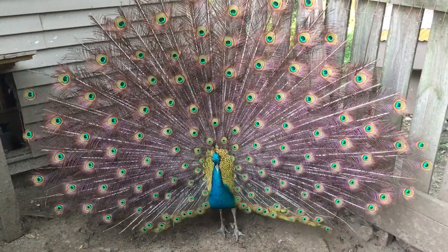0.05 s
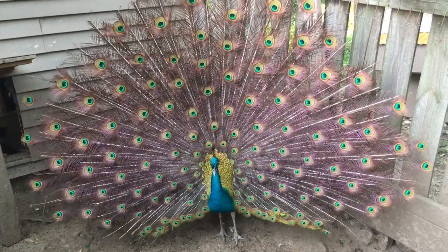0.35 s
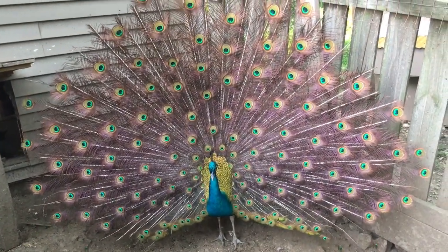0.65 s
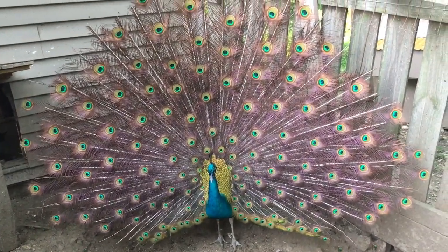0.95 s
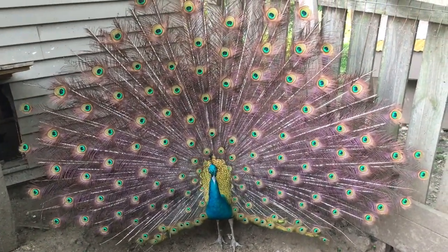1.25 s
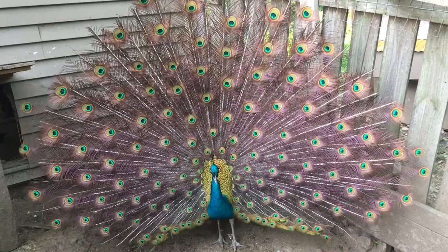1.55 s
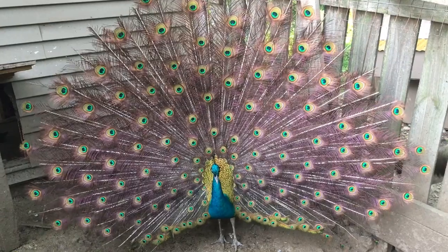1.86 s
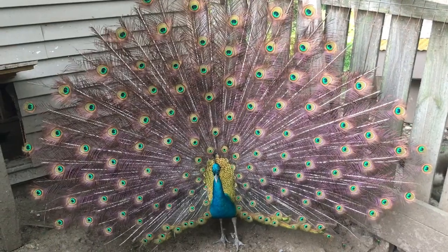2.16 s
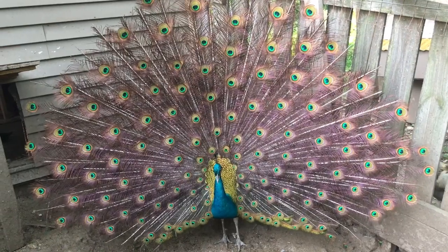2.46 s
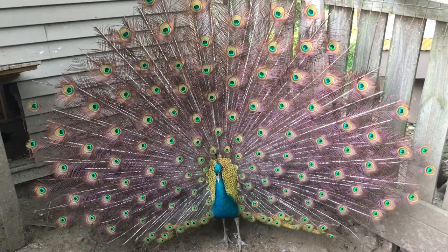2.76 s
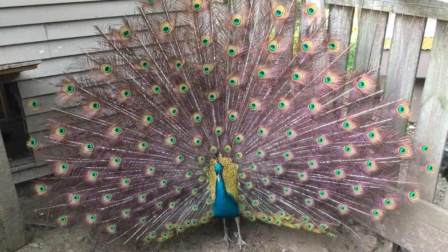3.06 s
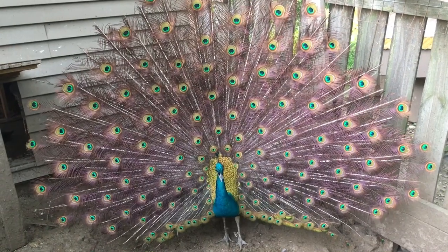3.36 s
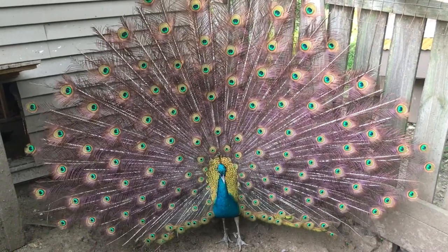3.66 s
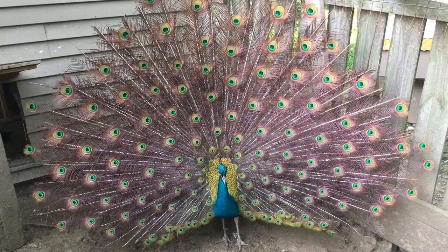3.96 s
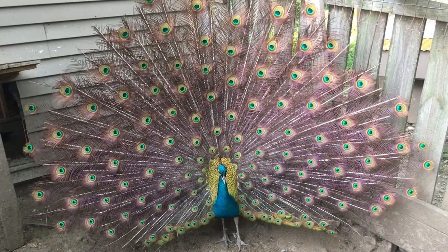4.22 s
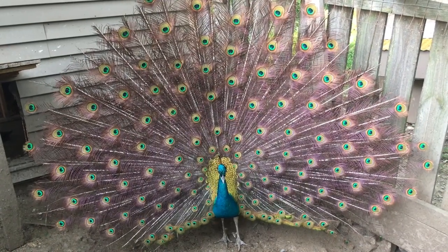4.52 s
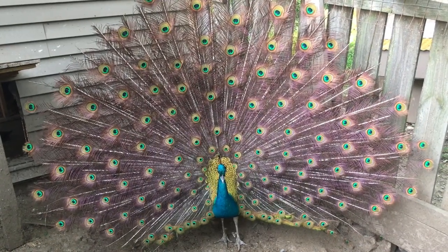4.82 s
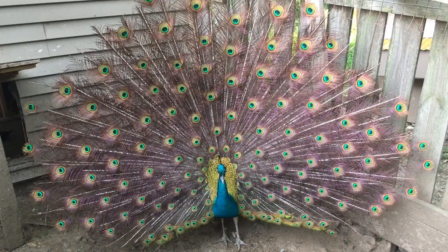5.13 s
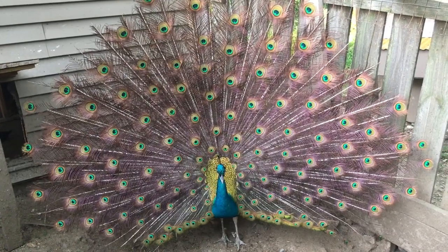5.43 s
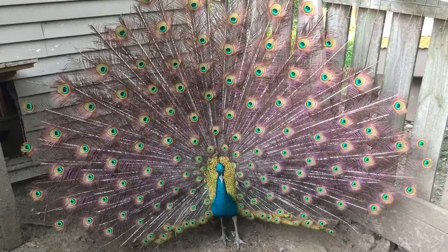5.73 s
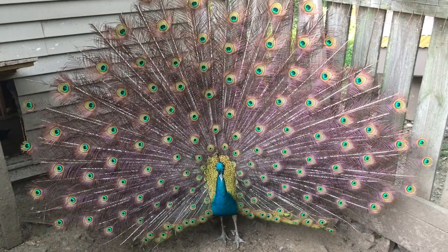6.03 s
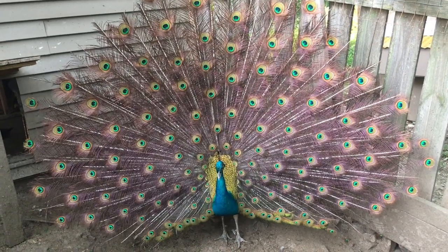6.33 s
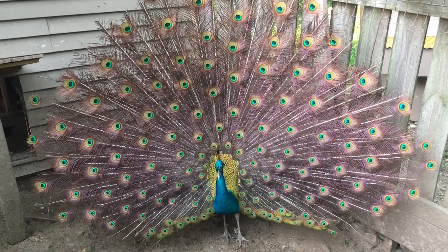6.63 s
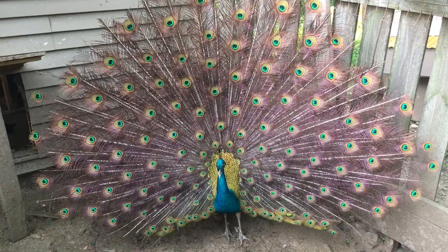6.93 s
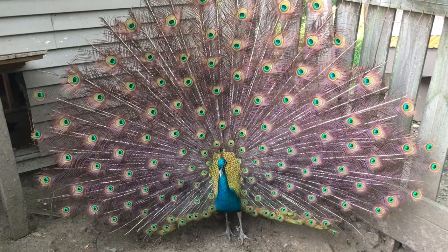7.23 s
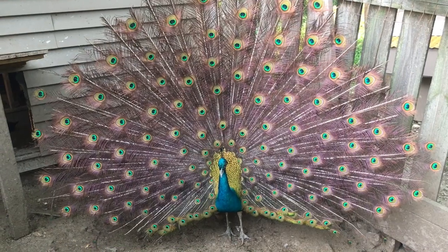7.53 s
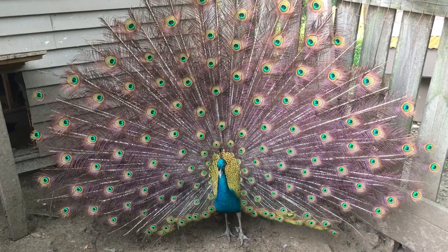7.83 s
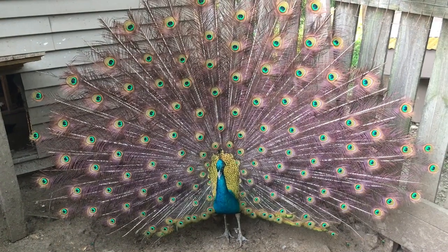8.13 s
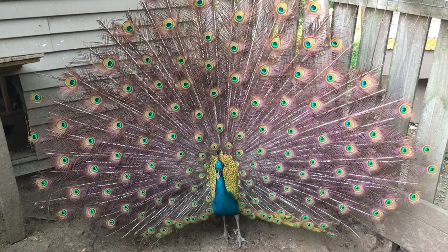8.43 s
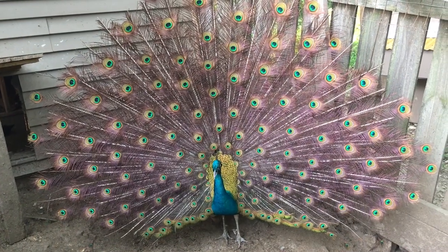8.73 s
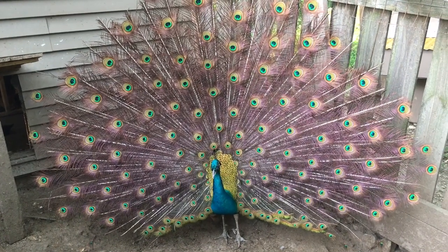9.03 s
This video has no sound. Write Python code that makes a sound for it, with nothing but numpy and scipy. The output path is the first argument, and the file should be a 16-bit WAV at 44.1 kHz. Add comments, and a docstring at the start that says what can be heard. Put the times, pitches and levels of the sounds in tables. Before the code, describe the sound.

A guinea fowl chatters in quick, harsh pulses that slow and soften within two seconds, giving way to single high yelps. A hen then clucks in a steady run, and later adds quieter clucks and low growls. Young birds whistle thinly, while a peacock's stiff feathers tick and a foot briefly scratches dry litter. The birds sound fairly near, in a small yard with a short echo and a faint outdoor hush.

```python
"""Harsh chatter from a fowl, likely a guinea fowl, slows and softens as its effort fades and gives way to
single yelps, the loudest of which open with a squeak. Hens cluck and growl, and young birds whistle. Each voice
is a membrane shaking in the bird's breath; the throat and beak shape the chatter, yelps and clucks. Dry litter
and stiff feathers tick as a peacock holds his train spread. The poultry yard lies between a clapboard wall and
a plank fence, which return a short echo over a faint outdoor hush."""
import sys
import numpy as np
from scipy import signal
from scipy.fft import rfft, irfft, next_fast_len
from scipy.io import wavfile
from scipy.ndimage import map_coordinates

SR = 44100
rng = np.random.default_rng(int(sys.argv[2]) if len(sys.argv) > 2 else 0)


def log_audio(samples):
    """Write samples as a 16-bit WAV file to the path given in sys.argv[1]."""
    # one column per channel
    frames = np.atleast_2d(samples).T
    # limit to full scale, then quantise
    limited = np.clip(frames, -1, 1)
    pcm = np.round(limited * 32767).astype(np.int16)
    wavfile.write(sys.argv[1], SR, pcm)


N = 404838

# Pairs are (no effort, full effort). The dB pairs are added to the level of each pulse.
CHATTER_S, CHATTER_HZ, CHATTER_PEAK = (0.067, 0.094), (1038, 1093), (0.61, 0.29)
TONE_DB, RASP_DB, TREBLE_DB, SQUEAK_DB = (2, -4), (-1.5, -.5), (-15.5, -7.5), (1, -1)
# the shaking repeats every third cycle (multiple of a third of the pitch, level [dB])
TONE_PARTS = [(1, -16), (2, -35.5), (3, -9), (4, -15), (5, -15), (6, 2)]
# how throat and beak shape the body of the rasp (frequency [Hz], gain [dB])
RASP_BODY_SHAPE = [(400, -45), (850, -14.5), (1150, -11), (1900, -4), (2300, -3.5), (2750, -6),
                   (3600, -7.5), (4200, -6), (4800, -13), (5400, -35), (8000, -29)]
# how they shape its treble (frequency [Hz], gain [dB])
RASP_TREBLE_SHAPE = [(3500, -19.5), (5200, -6.5), (6100, -4.5), (7500, -19), (8700, -13.5), (10500, -23.5),
                     (15500, -23.5)]
# pulses of harsh chatter (time [s], effort [0-1], base level [dB])
CHATTER_PULSES = [(-0.025, .95, -30.5), (0.072, 0.94, -31.5), (0.177, 1, -31.5), (0.273, 0.97, -28.5),
                  (0.375, .95, -29.5), (0.497, 0.89, -28.5), (0.617, 0.99, -29), (0.763, 0.83, -26.5),
                  (0.945, 0.86, -28.5), (1.152, .75, -27), (1.397, .3, -29.5), (1.665, 0.36, -29),
                  (2.353, .35, -29.5), (6.35, 0.06, -31.5), (8.332, 0, -33)]
def chatter(effort, db):
    """A squeak breaks into a rasp around a sagging tone; effort makes it longer, higher and harsher."""
    hz, rasp_db = between(CHATTER_HZ, effort), db + between(RASP_DB, effort)
    progress, push = swell(between(CHATTER_S, effort), between(CHATTER_PEAK, effort), sharpness=1.24)
    sag = 1 + .025 * (.5 - progress)
    phase = vibrate(hz / 3 * sag, jitter=between((.04, .022), effort), rate=451)
    locked = between((.15, .85), effort ** 3)  # the in-between tones grow strong only at high effort
    tone = unit(sum(undb(part_db) * (locked if round(k) % 3 else 1) * overtone(phase, round(k))
                    for k, part_db in TONE_PARTS))
    tone *= undb(3.4 * wander(len(push), 170))
    tone *= undb(db + between(TONE_DB, effort)) * push
    # the membrane stumbles around its pitch, so the overtones smear into a rasp
    stumble = vibrate(np.full(len(push), hz / 3), jitter=.03, rate=500)
    buzz = unit(sum(rng.rayleigh() * overtone(stumble, k) for k in range(3, 30)))
    chaos = unit(1.1 * buzz + turbulence(stumble, depth=.8)) * undb(1.8 * wander(len(push), 190))
    rasp = undb(rasp_db) * unit(colour(chaos, RASP_BODY_SHAPE)) * push
    treble_db = rasp_db + between(TREBLE_DB, effort)
    treble = undb(treble_db) * unit(colour(chaos, RASP_TREBLE_SHAPE)) * push ** 1.22
    squeak = np.sin(vibrate(2900 - 700 * progress, jitter=0.074, rate=500))
    squeak *= np.exp(-((progress - .14) / 0.29) ** 2) * push ** 0.24  # loudest near the start
    return tone + rasp + treble + undb(db + between(SQUEAK_DB, effort)) * squeak


# Pairs are (easy, strained): an easy yelp swells and rises, a strained one bursts out and sags.
YELP_STRAIN, YELP_PEAK, YELP_GLIDE = (0.26, 0.306), (0.33, 0.19), (0.076, -.035)
# how the throat shapes the overtones (frequency [Hz], gain [dB])
YELP_THROAT_SHAPE = [(700, -25), (1200, -11.5), (2800, 8), (4400, -2), (5300, -10.5), (6200, -7),
                     (7500, -19.5), (10000, -32), (12000, -27), (15500, -34.5)]
# the hiss of strained breath (frequency [Hz], gain [dB])
HISS_SHAPE = [(600, -0.5), (1200, -13), (2800, 0.5), (4400, 0.5), (6300, -15), (8000, -15), (10000, -24.5),
              (12000, -16.5), (15500, -32)]
# yelps (time [s], rough length [s], pitch [Hz], strain [0-1], main note [dB], octave [dB], the rest [dB])
YELP_CALLS = [(0.125, .056, 1143, 0.04, -32, -48, -46), (0.32, 0.065, 1264, .2, -35.5, -31, -43),
              (1.043, .056, 1244, 0.31, -35.5, -44, -45), (1.238, 0.044, 1262, 0.31, -34, -54, -41),
              (1.582, 0.042, 1425, .35, -36, -40.5, -39.5), (1.615, 0.064, 1530, 1, -41, -38, -40.5),
              (1.811, .033, 1644, 0.76, -30, -22, -17), (2.229, 0.025, 1450, 0.29, -21, -22.5, -25.5),
              (3.003, 0.069, 1513, 0.8, -38, -35, -35.5), (3.165, 0.078, 1527, 0.25, -49.5, -41.5, -57),
              (3.524, 0.057, 1552, 0.77, -39, -33, -35), (4.372, 0.044, 1093, 0.7, -33.5, -41.5, -51),
              (4.52, 0.091, 1137, 0.3, -45.5, -58, -51.5), (4.687, 0.056, 1314, 0.59, -39, -42, -40),
              (5.048, .094, 963.3, .36, -39.5, -43, -34), (5.52, 0.061, 1185, 0.34, -39.5, -50, -53),
              (5.619, 0.079, 1208, 0.17, -31.5, -35, -51.5), (5.807, 0.051, 1287, 0.68, -37.5, -40.5, -41),
              (6.892, .056, 952.6, 0.47, -21, -29, -22.5), (7.877, 0.046, 1452, 0.99, -39.5, -46, -45.5),
              (8.625, .099, 1163, 0.25, -36.5, -33.5, -42.5)]
def yelp(length, hz, strain, note_db, octave_db, upper_db):
    """A short high note; strain shakes the pitch, adds a growl beneath it and lets air hiss through."""
    peak, glide = np.interp(strain, YELP_STRAIN, YELP_PEAK), np.interp(strain, YELP_STRAIN, YELP_GLIDE)
    progress, push = swell(length * 1.08, peak, sharpness=1.4)
    bend = 1 + glide * (progress - .5) - 0.08 * (progress - .5) ** 2
    phase = vibrate(hz * bend, jitter=0.0046 + 0.06 * strain, rate=1000)
    low = np.sqrt(2) * (undb(note_db) * np.cos(phase) + undb(octave_db) * np.cos(2 * phase))
    upper = unit(colour(overtones(phase, first=3, count=11), YELP_THROAT_SHAPE))
    throb = 1 + strain * np.cos(vibrate(np.full(len(push), hz / 3), jitter=0.14, rate=522))
    air = unit(colour(turbulence(phase, depth=0.77), HISS_SHAPE))
    edge = unit(upper + 1.8 * strain * air)
    bright_db = 0.43 * (upper_db + 33.5)  # a harder cry has more treble
    edge = unit(colour(edge, [(4000, 0.0021), (9000, bright_db)]))
    cry = low + undb(upper_db) * edge * push ** 0.067
    cry *= throb * push * undb(2.0 * strain * wander(len(push), 400))
    return colour(cry, [(0.53 * hz, -20), (0.79 * hz, 0)])  # little sounds below the main note, so the growl stays faint in the bass


# how a hen's open beak shapes her voice (frequency [Hz], gain [dB])
BEAK_SHAPE = [(900, -35), (1500, 2.5), (1800, 6), (2150, -8.5), (2500, -30), (3000, -61), (3600, -6.5),
              (5000, -20.5), (6000, -18), (9000, -27), (15000, -34.5)]
def hen_voice(length, hz, throat_hz, db, beak_db, chest_db, peak):
    """Uneven low pulses make the throat and chest ring; the beak joins in as it opens."""
    _, push = swell(length * 1.3, peak * .94, sharpness=1.4)
    phase = vibrate(hz * (.86 + .17 * push), jitter=0.0452, rate=200)
    puffs = unit(pulses(phase)) * undb(1.2 * wander(len(push), 220))
    puffs += .45 * turbulence(phase, depth=.8)
    # the throat's ring outlasts a pulse and fills the gaps between them
    ring = np.sin(vibrate(throat_hz * (0.825 + 0.1108 * push), jitter=0.062, rate=410))
    ring *= undb(2.0 * wander(len(push), 270))
    throat = cavity(puffs, (throat_hz, 420), (throat_hz, 700)) + 1.05 * ring
    throat += 0.22 * cavity(puffs, (830, 200), (807, 300))
    chest = cavity(puffs, (hz, 91), (hz, 110)) + cavity(puffs, (445, 140), (442, 180))
    beak = unit(unit(colour(puffs, BEAK_SHAPE)) + 1.1 * cavity(puffs, (2040, 220), (2040, 450))) * push
    return undb(db) * push * (unit(throat) + undb(chest_db) * chest + undb(beak_db + 0.94) * beak)


# clucks (time near the peak [s], rough pitch [Hz], throat ring [Hz], level [dB], rough beak boost [dB])
HEN_CLUCKS = [(1.404, 260.5, 573, -37.5, -7), (1.497, 260.6, 561, -39.5, -12), (1.791, 285, 590, -36, -4),
              (1.955, 224.5, 499, -39, -7.5), (2.952, 259.6, 560, -43.5, -4),
              (3.135, 243.2, 876, -30.5, -9), (3.333, 320, 680, -30.5, -5), (3.502, 250, 546, -36, -7.5),
              (3.583, 340.5, 600, -29, 1), (3.75, 274.4, 599, -32.5, -3.5), (3.915, 260, 500, -32.5, -4.5),
              (4.087, 269.7, 493.4, -31, -5.5), (4.263, 265.8, 479, -29, -6), (4.44, 254.5, 522, -29, -9.5),
              (4.61, 234.5, 485, -31, -13.5), (4.69, 258.4, 492, -36, -16), (4.81, 260, 781, -37.5, -22),
              (5.323, 264.6, 520, -28, -26), (5.5, 240, 676, -40, -19), (5.706, 235.4, 770, -46, -4),
              (6.578, 228.6, 776, -41.5, -23), (7.331, 219, 900, -39, -26), (7.503, 224.6, 875, -39.5, -24),
              (7.68, 217.6, 896, -38.5, -15), (7.78, 220, 845, -46.5, -3), (8.281, 218, 890, -39, -23),
              (8.467, 217.1, 956, -35.5, -17), (8.657, 217, 755, -43, -11), (8.882, 232.7, 960, -36.5, -24),
              (8.953, 208, 792, -37, -15), (9.184, 217.4, 588, -34.5, -13)]
def clucking():
    """Short bursts of the hen's voice; the louder, the longer."""
    out = np.zeros(N)
    peak = .5
    for time, hz, throat_hz, db, beak_db in HEN_CLUCKS:
        length = .035 * 2 ** ((db + 40) / 24)  # twice as long for every 24 dB
        cluck = hen_voice(length, hz, throat_hz, db, beak_db, chest_db=-14, peak=peak)
        add(out, time - 1.15 * peak * length, cluck)
    return out


# a hen's low growls (time [s], rough pitch [Hz], level [dB])
HEN_GROWLS = [(3.655, 184.6, -43.5), (3.985, 185, -40), (5.37, 190.3, -40.5), (6.755, 205.3, -33),
              (8.724, 209, -31.5), (9.045, 210.1, -30.5)]
def growl(hz, db):
    """The hen's voice held longer, through a tight throat and a nearly closed beak."""
    return hen_voice(0.0758, hz, throat_hz=1168, db=db, beak_db=-23, chest_db=-13, peak=.42)


WARBLE_HZ, WHISTLE_FADE_S, FENCE_ECHO_S = 9.5, 0.012, 0.015
# whistles of young birds, and at 1.8 s and 6.883 s the short squeaks that open the fowl's loudest yelps (time
# [s], length [s], start pitch [Hz], middle pitch [Hz], end pitch [Hz], warble [share of pitch], base level
# [dB])
WHISTLES = [(1.228, 0.054, 3050, 3000, 3020, 0, -36.5), (1.8, .03, 3650, 3115, 2860, 0.0014, -16.5),
            (1.94, 0.25, 2860, 2865, 2843, 0.0018, -49), (2.16, 0.077, 2840, 2887, 3020, 0, -44.5),
            (2.29, 0.074, 4200, 3800, 3400, 0.0096, -41.5),
            (2.465, 0.349, 2980, 2978, 2840, .035, -49), (2.815, .115, 3340, 2946, 2840, 0.0012, -46),
            (2.943, 0.069, 3100, 3366, 3110, 0.0047, -40), (3.05, .12, 3150, 3320, 3010, 0, -42),
            (5.055, .14, 2930, 2899, 2920, 0, -52), (6.172, 0.037, 2600, 3710, 5200, 0.0024, -41),
            (6.25, 0.1, 2750, 2660, 2460, 0.0041, -52.5), (6.45, 0.19, 2620, 2564, 2720, 0, -54),
            (6.52, 0.031, 2700, 3480, 3020, 0.023, -47), (6.64, .14, 2900, 4020, 2790, 0.0019, -52),
            (6.77, 0.12, 2850, 3100, 2700, 0.0059, -53), (6.883, 0.024, 2900, 2753, 2650, 0, -20.5),
            (8.03, .08, 2380, 2780, 2470, 0.0034, -51.5), (8.1, 0.23, 2450, 2430, 2504, 0.0017, -55),
            (8.42, 0.19, 2630, 3900, 2510, 0.0055, -50), (8.66, 0.49, 2960, 2956, 3060, .03, -49),
            (9.115, 0.057, 3200, 3020, 2430, 0, -45)]
def whistle(length, start_hz, middle_hz, end_hz, warble, db):
    """A thin tone with a faint octave bends, warbles, falters and blends with its echo off the fence."""
    t = np.arange(int(max(length, .01) * SR)) / SR
    push = np.sin(np.pi / 2 * np.clip(np.minimum(t, t[-1] - t) / WHISTLE_FADE_S, 0, 1)) ** 2
    arc_hz = np.polyval(np.polyfit([0, .5, 1], [start_hz, middle_hz, end_hz], 2), t / t[-1])
    wobble = 1 - warble * np.cos(2 * np.pi * WARBLE_HZ * t)
    phase = vibrate(arc_hz * wobble, jitter=0.0049 + .2 * abs(warble), rate=310)
    tone = np.sqrt(2) * (np.sin(phase) + undb(-15) * np.sin(2 * phase))
    falter_db = 2.5 * wander(len(t), 114.7) + wander(SR, 30.3)[:len(t)]
    tone *= push * undb(db + falter_db)
    lag = int(FENCE_ECHO_S * SR)
    return .9 * np.pad(tone, (0, lag)) + .4 * np.pad(tone, (lag, 0))


# the loudest ticks of quills and litter (time [s], peak level [dB], ring [Hz])
DRY_TICKS = [(2.8636, -35.5, 5710), (2.9376, -22.5, 9350), (2.9848, -28.5, 3500), (3.9523, -32.5, 11600),
             (3.9908, -30, 3450), (5.3764, -25, 4180), (5.948, -29.5, 2390), (5.9916, -25, 3360),
             (6.0107, -30, 3150), (6.0637, -32, 5300), (6.1375, -33.5, 3490), (7.263, -39, 7940),
             (7.64, -33, 3920), (7.7243, -38.5, 3500), (8.0147, -38, 4880)]
# soft knocks on wood and ground (time [s], peak level [dB], ring [Hz])
SOFT_KNOCKS = [(.094, -24, 716), (4.176, -37, 800), (4.677, -34, 185), (5.032, -32.5, 550)]
def tick(db, hz):
    """A dry snap with a short scrape behind it; a low one sounds like a knock."""
    t = np.arange(SR // 20) / SR
    snap = rng.standard_normal(len(t)) * (np.exp(-t / .001) + .15 * np.exp(-t / .011))
    snap = resonate(snap, hz, .55 * hz) + .1 * snap * min(hz / 3000, 1)
    return undb(db) * snap / abs(snap).max()


def rustle(start, end, db, hz, count):
    """Small ticks scattered at random from start to end: most faint, a few louder."""
    out = np.zeros(N)
    for when, size, pitch in rng.random((count, 3)):
        add(out, start + when * (end - start), tick(db + 17 * size ** 4, hz * 2 ** (2 * pitch - 1)))
    return out


# echoes off the ground, a post, the wall and the fence (delay [s], gain [factor])
YARD_ECHOES = [(.0031, 0.4), (.0057, 0.14), (.0094, -0.45), (.021, -0.011)]
def yard(sound, fade_s, tail_db):
    """Nearby surfaces bounce the sound back, then a short, duller tail dies away by 60 dB in fade_s."""
    t = np.arange(SR // 2) / SR
    tail = rng.standard_normal(len(t)) * np.exp(-np.log(1000) * t / fade_s) * (1 - np.exp(-t / 0.0026))
    tail /= np.sqrt(np.sum(tail ** 2))
    tail = colour(tail, [(150, 13.5), (600, 2.5), (1200, 6.5), (3000, 4), (6000, 1.0), (14000, -2.5)])
    response = undb(tail_db) * tail
    response[0] += 1  # the direct sound
    for delay, gain in YARD_ECHOES:
        response[int(delay * SR)] += gain
    return signal.fftconvolve(sound, response)[:N]


# the outdoor hush, strongest in the bass (frequency [Hz], gain [dB])
HUSH_SHAPE = [(15, -48), (25, -12), (110, 0.5), (233, -4), (359, -7.5), (598, -3), (666, -10), (1200, -9.5),
              (1300, -14.5), (3090, -14.5), (3720, -20.5), (5880, -25.5), (7910, -28.5), (10400, -33),
              (15500, -33.5)]
def hush(db):
    """Distant outdoor noise that swells a little."""
    noise = unit(colour(rng.standard_normal(N), HUSH_SHAPE))
    return undb(db) * noise * undb(1.1 * wander(N, 2.5) + .6 * wander(N, 12))


def swell(length, peak, sharpness):
    """Progress (0-1) through a call, and the push of air, which is greatest when progress is at peak."""
    progress = np.linspace(0, 1, int(max(length, .01) * SR))
    arch = np.interp(progress, [0, np.clip(peak, .05, .95), 1], [0, np.pi, 0])
    return progress, np.sin(arch / 2) ** sharpness


def vibrate(hz, jitter, rate):
    """Phase (2 pi for each cycle) of a voice membrane whose pitch shakes at random."""
    return 2 * np.pi * np.cumsum(hz * (1 + jitter * wander(len(hz), rate))) / SR


def pulses(phase):
    """One click a cycle, shared between neighbouring samples."""
    cycle = phase / (2 * np.pi)
    return np.maximum(1 - abs(cycle - np.round(cycle)) / (abs(np.gradient(cycle)) + 1e-9), 0)


def overtone(phase, k):
    """A pure tone at k times the pitch, with its own random lag through the throat."""
    return np.cos(k * phase + rng.uniform(0, 2 * np.pi))


def overtones(phase, first, count):
    """Equally strong overtones, leaving out any too high for the sample rate."""
    top = np.pi / np.mean(np.diff(phase))
    return sum(overtone(phase, k) * (k < top) for k in range(first, first + count))


def turbulence(phase, depth):
    """Air noise let through once a cycle."""
    return unit(rng.standard_normal(len(phase)) * np.exp(depth * np.cos(phase)))


def resonate(x, hz, width_hz):
    """Let x ring in one band, with gain 1 at its centre."""
    return signal.lfilter(*signal.iirpeak(min(hz, SR / 2 - 1), hz / min(width_hz, SR / 4), fs=SR), x)


def cavity(x, first, second):
    """A ringing hollow: two bands in a row, each (centre [Hz], width [Hz])."""
    return unit(resonate(resonate(x, *first), *second))


def colour(x, points):
    """Shape bass and treble along a curve of (frequency [Hz], gain [dB]) points."""
    hz, db = np.transpose(points)
    size = next_fast_len(len(x) + 512)
    bin_hz = np.maximum(np.fft.rfftfreq(size, 1 / SR), 1)
    gain = undb(np.interp(np.log(bin_hz), np.log(hz), db))
    return irfft(rfft(x, size) * gain, size)[:len(x)]


def wander(size, rate):
    """A random drift of typical size 1 that turns rate times a second."""
    at = np.arange(size) * rate / SR
    return unit(map_coordinates(rng.standard_normal(size // 2 + 2), [at], order=1))


def between(pair, share):
    """The value a share of the way from the first of a pair to the second."""
    return pair[0] + (pair[1] - pair[0]) * np.clip(share, 0, 1)


def undb(db):
    """Decibels to gain."""
    return 10 ** (np.asarray(db) / 20)


def unit(x):
    """Scale to an average strength (rms) of 1."""
    return x / np.sqrt(np.mean(x ** 2) + 1e-18)


def add(out, time, x):
    """Mix x into out, starting at a time in seconds."""
    start = int(round(time * SR))
    lo, hi = max(start, 0), min(start + len(x), N)
    out[lo:hi] += x[lo - start:hi - start]


def play(table, source):
    """Sound every row of a table at its time."""
    out = np.zeros(N)
    for time, *row in table:
        add(out, time, source(*row))
    return out


def scene():
    """All the birds share one yard; the chatter has the most echo."""
    whistles = colour(play(WHISTLES, whistle), [(3200, 0.5), (4000, -6.0)])  # softer high notes
    fowl = yard(play(CHATTER_PULSES, chatter), fade_s=0.33, tail_db=-7.0)
    high_calls = yard(play(YELP_CALLS, yelp) + whistles, fade_s=0.19, tail_db=-11.0)
    hens = yard(clucking() + play(HEN_GROWLS, growl), fade_s=0.28, tail_db=-15)
    feathers = rustle(0, N / SR, db=-54.5, hz=4500, count=150)
    feathers += rustle(2.9, 3.9, db=-44.5, hz=7550, count=22)  # the peacock's train shifts
    litter = rustle(5.85, 6.22, db=-41, hz=1640, count=26)  # a foot scratches the ground
    taps = play(DRY_TICKS, tick) + play(SOFT_KNOCKS, tick)
    stirring = yard(taps + feathers + litter, fade_s=0.16, tail_db=-7.5)
    return (fowl + high_calls + hens + stirring + hush(db=-53.5))[None]


def record(dry):
    """Drop the deepest bass, clip any extreme peak and cut the highest treble."""
    bass_cut = signal.butter(4, 36, "high", fs=SR, output="sos")
    treble_cut = signal.ellip(10, .2, 70, 15900, fs=SR, output="sos")
    return signal.sosfilt(treble_cut, np.clip(signal.sosfilt(bass_cut, dry), -.92, .92))


dry = scene()
out = record(dry)
log_audio(out)
```